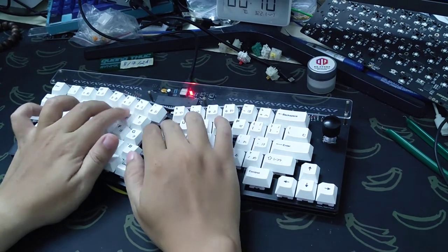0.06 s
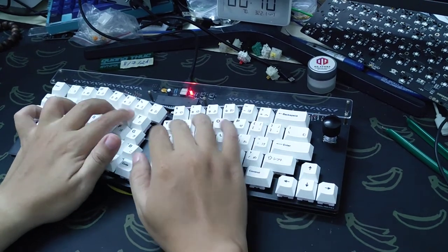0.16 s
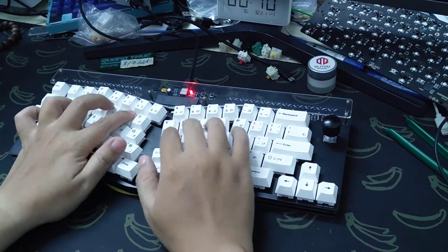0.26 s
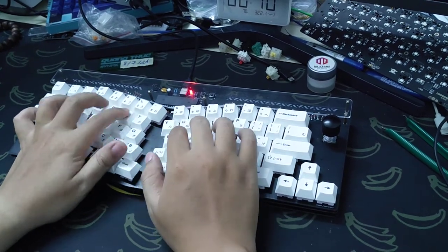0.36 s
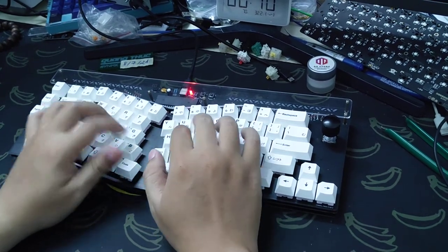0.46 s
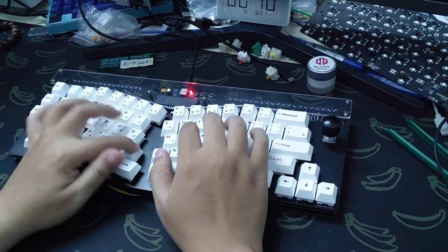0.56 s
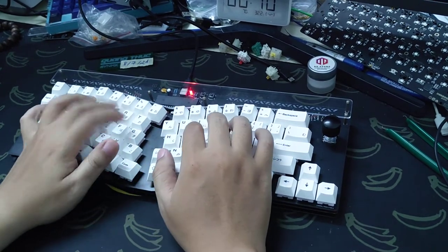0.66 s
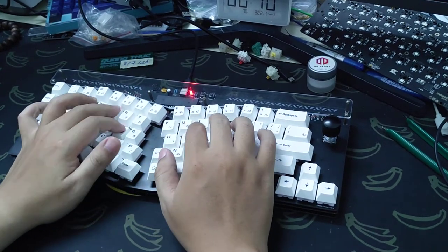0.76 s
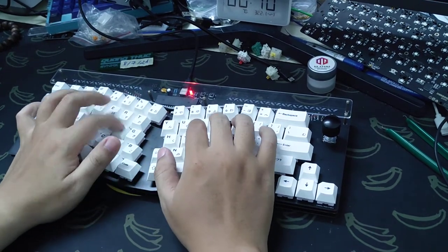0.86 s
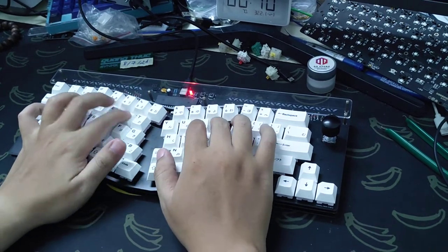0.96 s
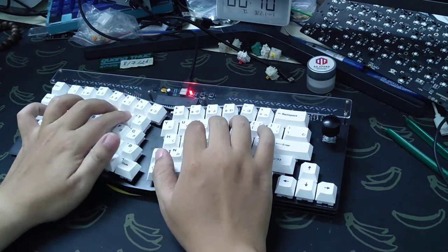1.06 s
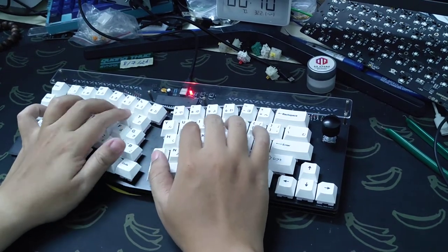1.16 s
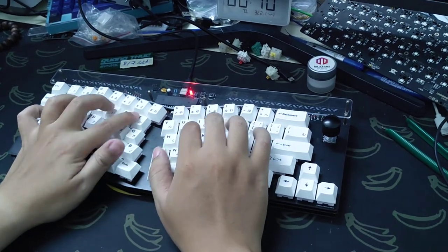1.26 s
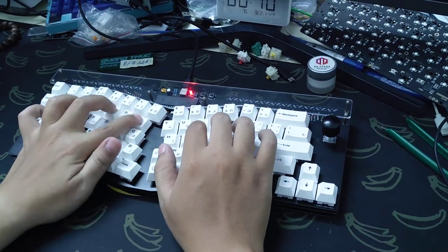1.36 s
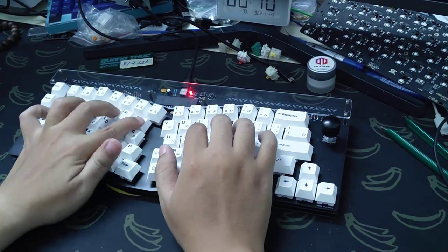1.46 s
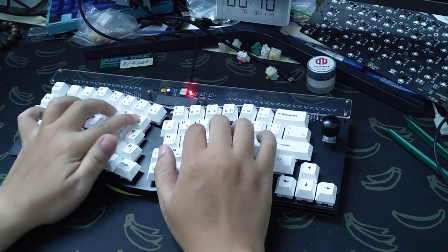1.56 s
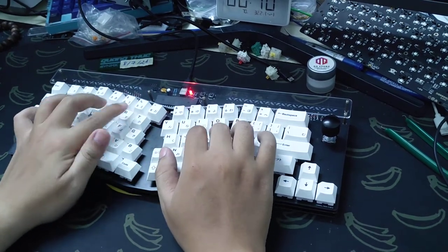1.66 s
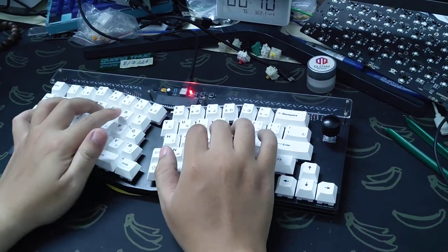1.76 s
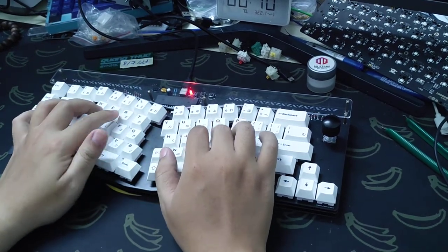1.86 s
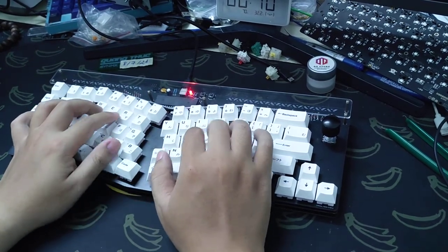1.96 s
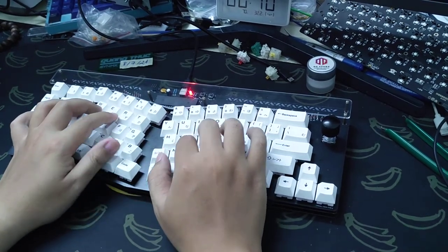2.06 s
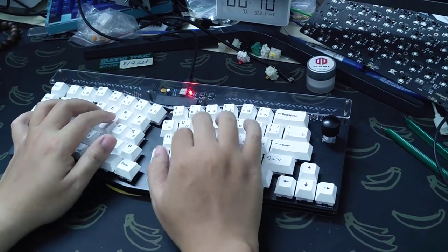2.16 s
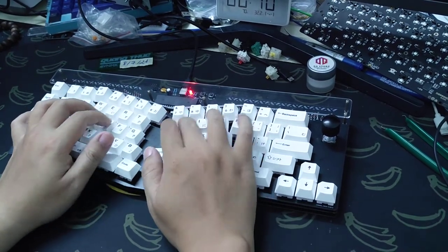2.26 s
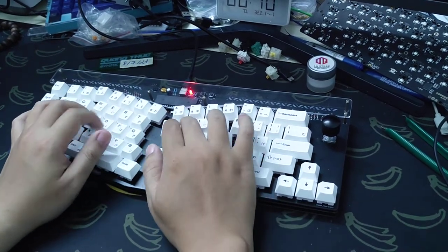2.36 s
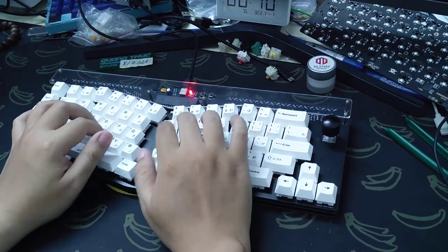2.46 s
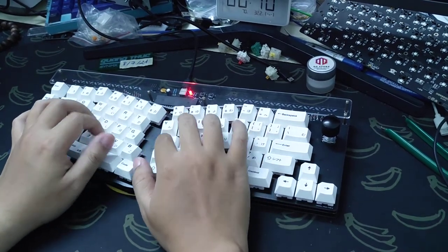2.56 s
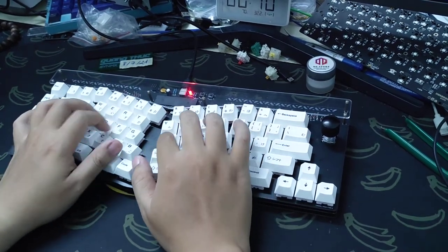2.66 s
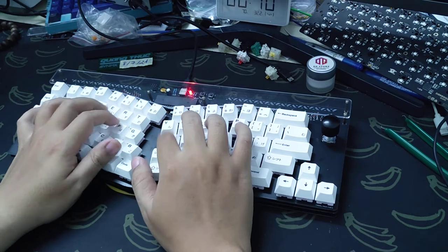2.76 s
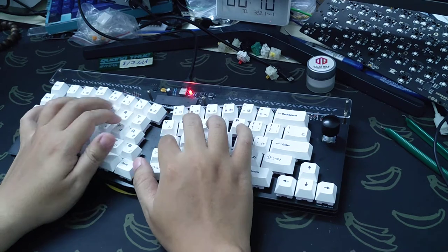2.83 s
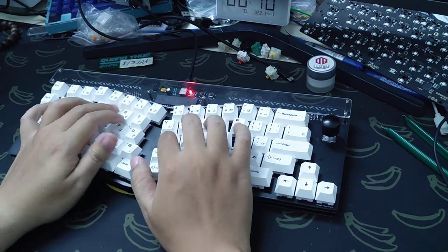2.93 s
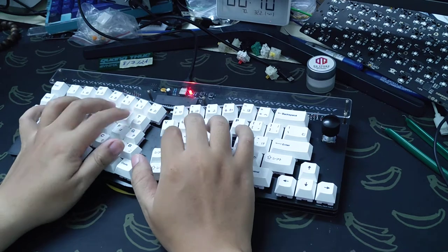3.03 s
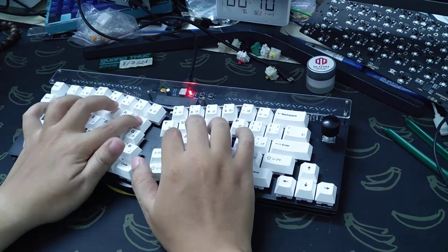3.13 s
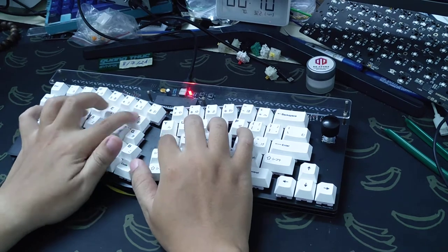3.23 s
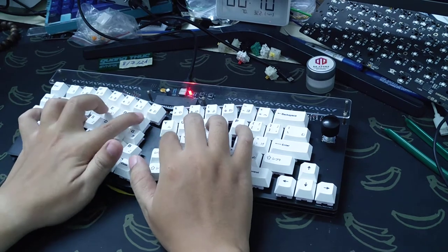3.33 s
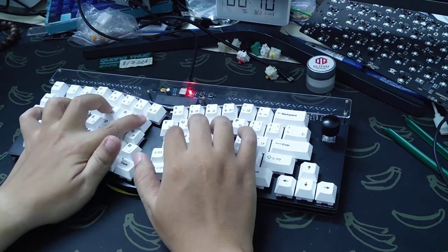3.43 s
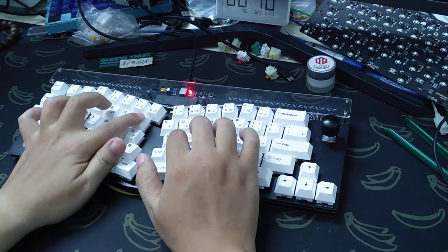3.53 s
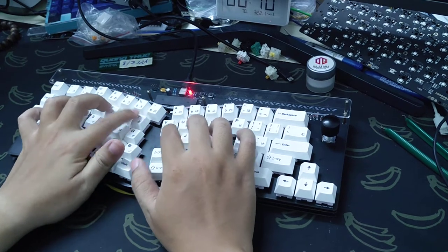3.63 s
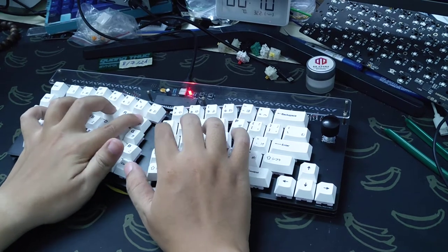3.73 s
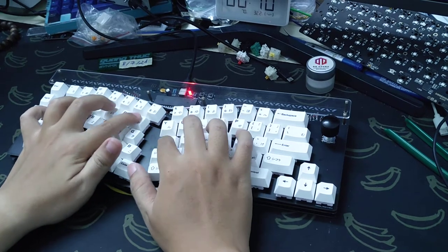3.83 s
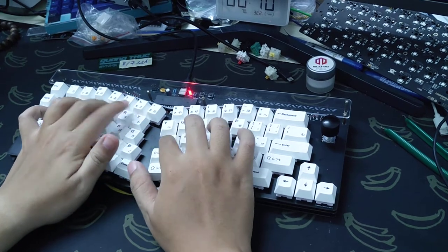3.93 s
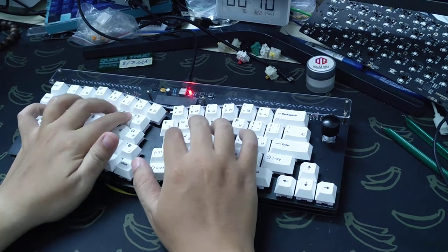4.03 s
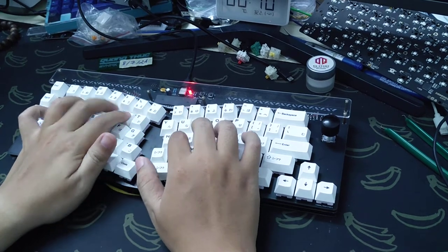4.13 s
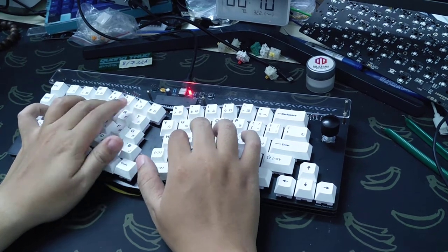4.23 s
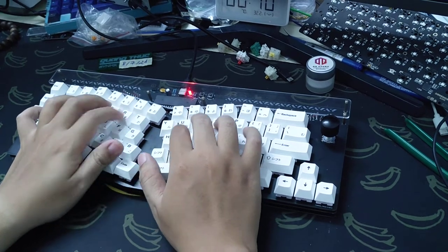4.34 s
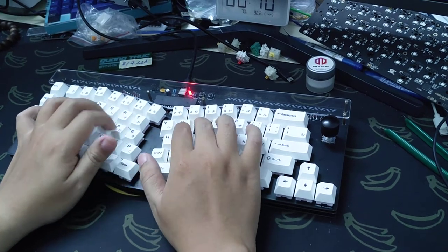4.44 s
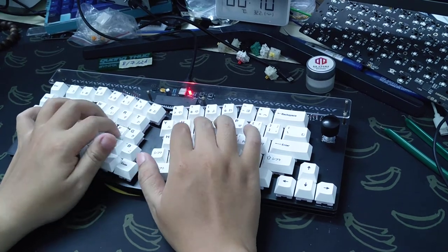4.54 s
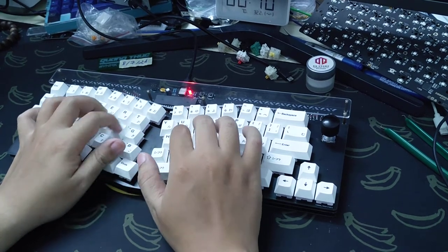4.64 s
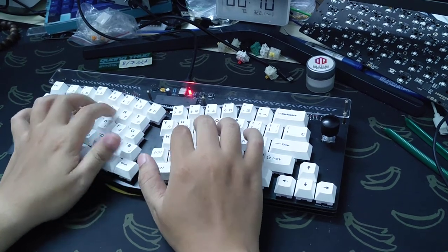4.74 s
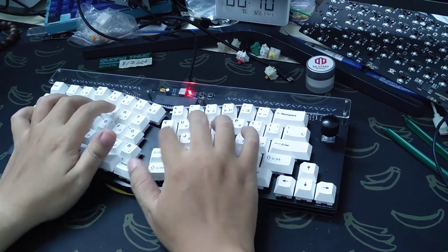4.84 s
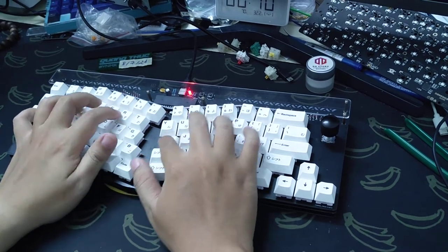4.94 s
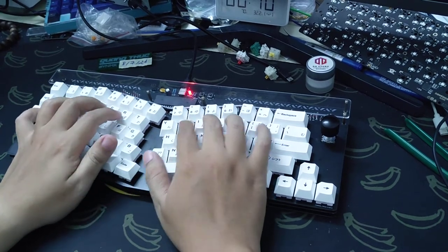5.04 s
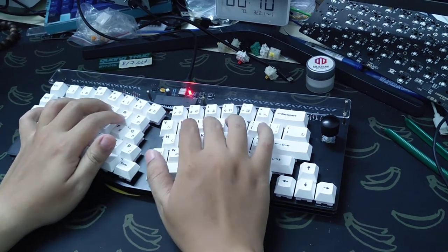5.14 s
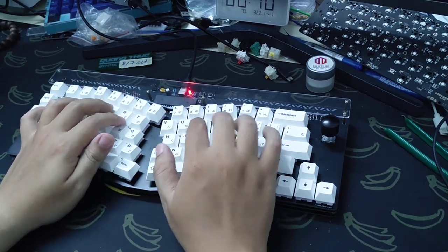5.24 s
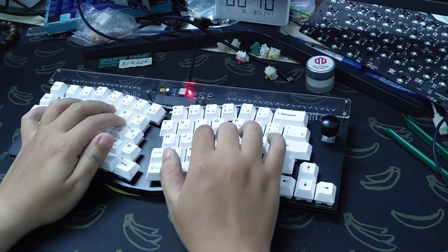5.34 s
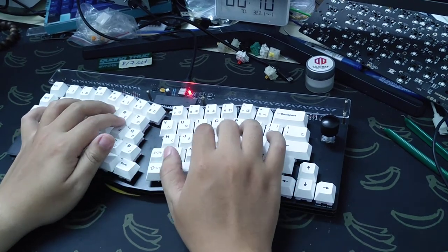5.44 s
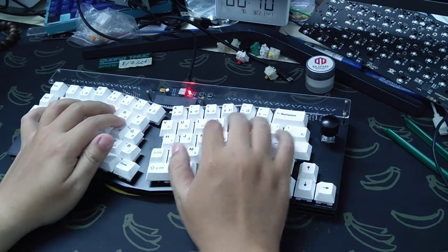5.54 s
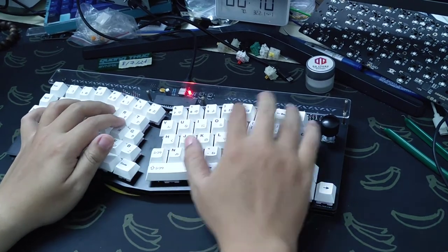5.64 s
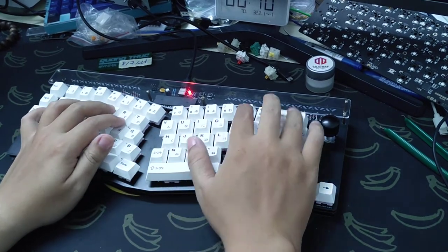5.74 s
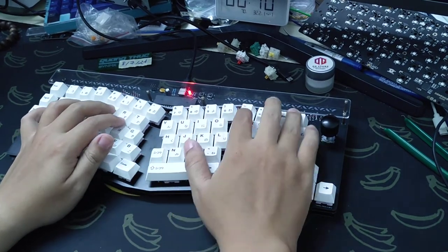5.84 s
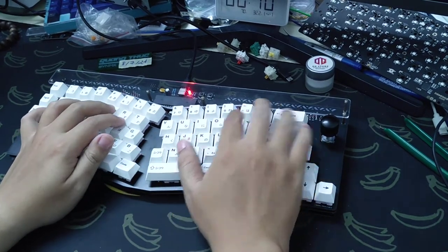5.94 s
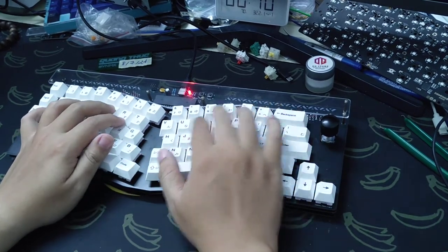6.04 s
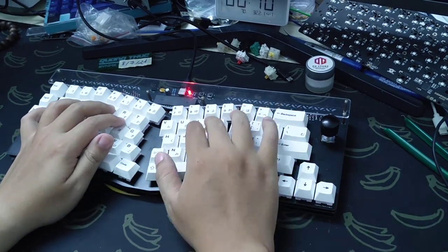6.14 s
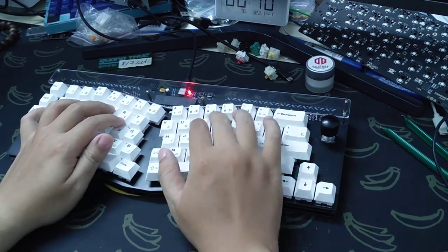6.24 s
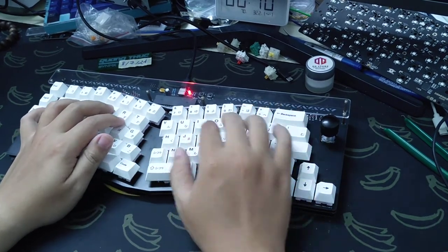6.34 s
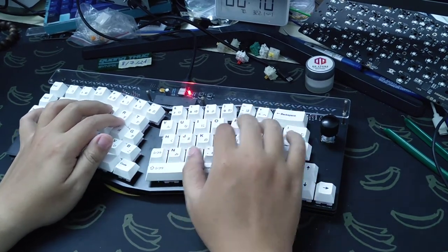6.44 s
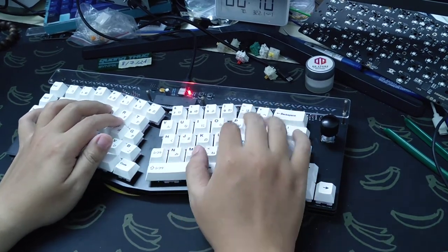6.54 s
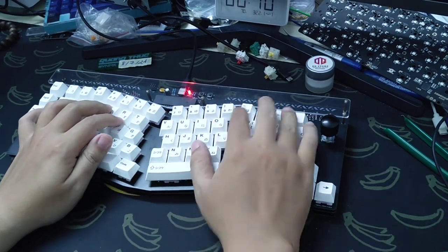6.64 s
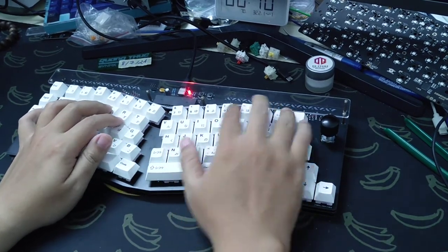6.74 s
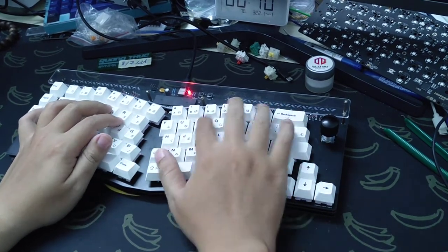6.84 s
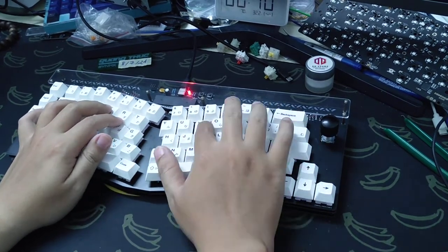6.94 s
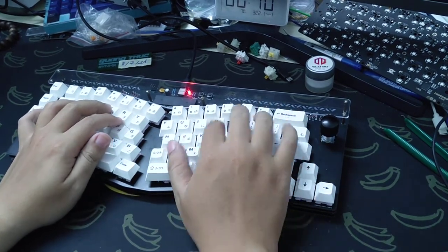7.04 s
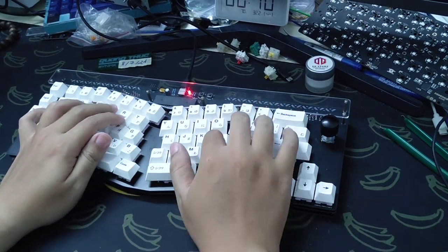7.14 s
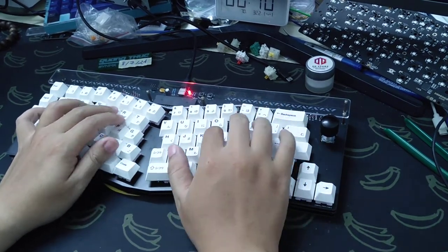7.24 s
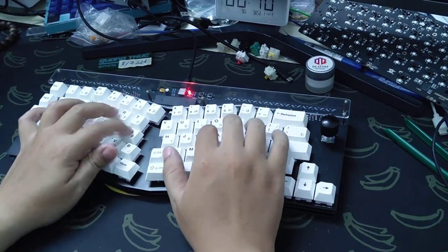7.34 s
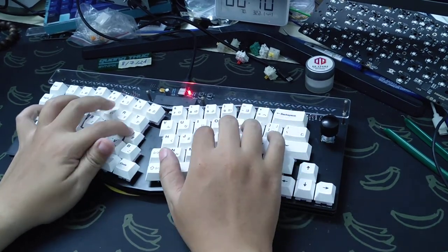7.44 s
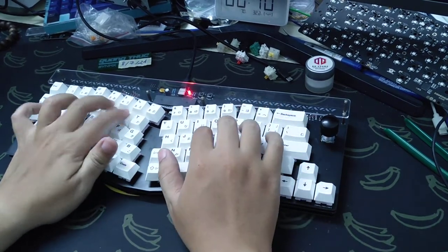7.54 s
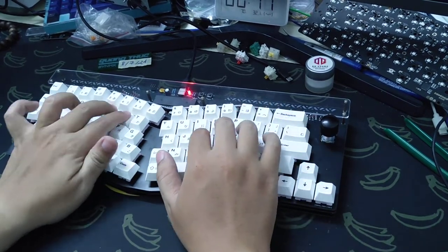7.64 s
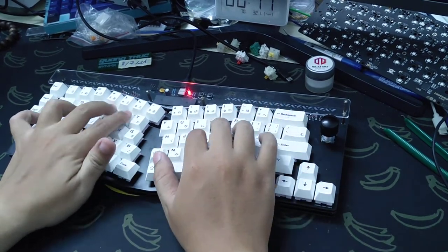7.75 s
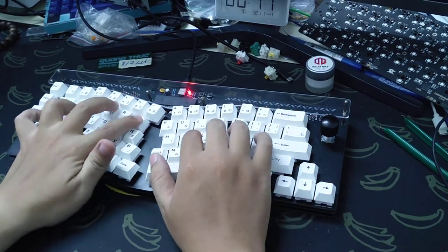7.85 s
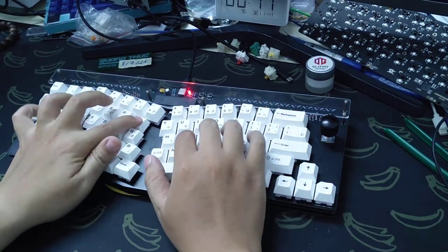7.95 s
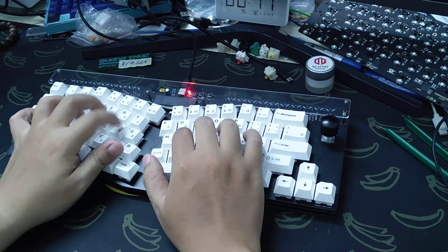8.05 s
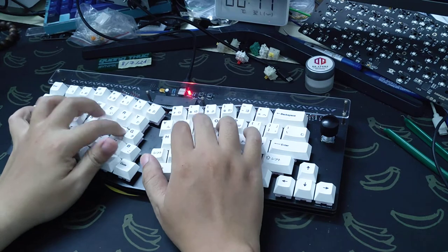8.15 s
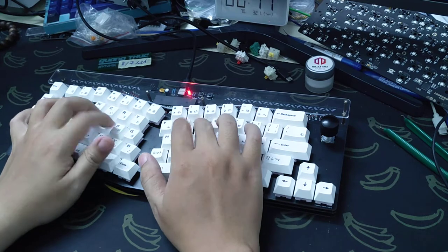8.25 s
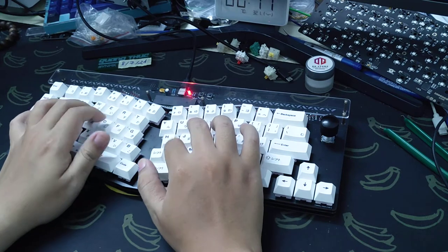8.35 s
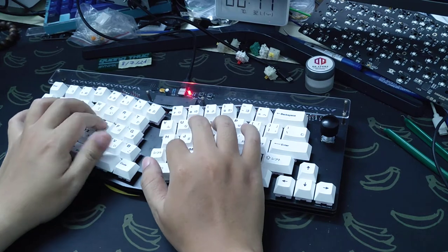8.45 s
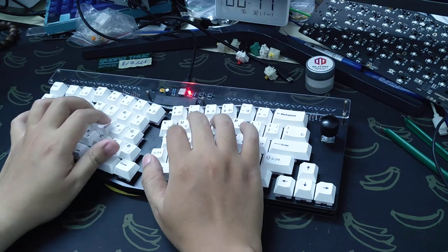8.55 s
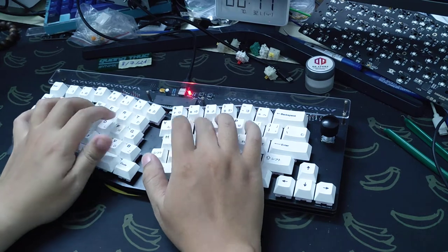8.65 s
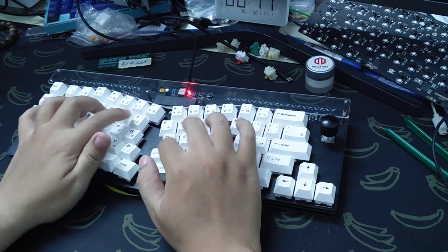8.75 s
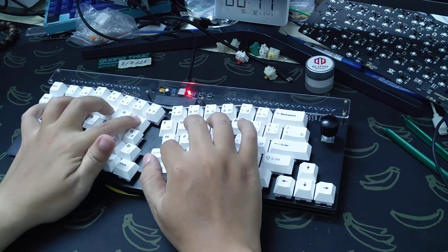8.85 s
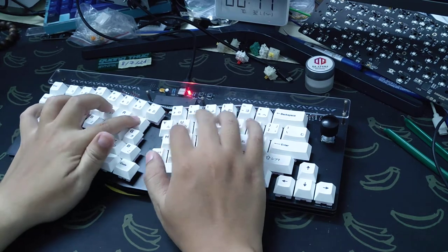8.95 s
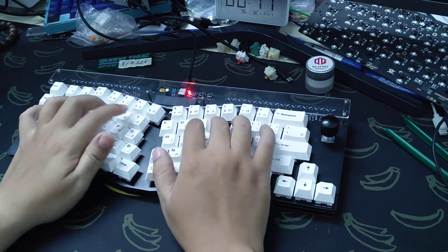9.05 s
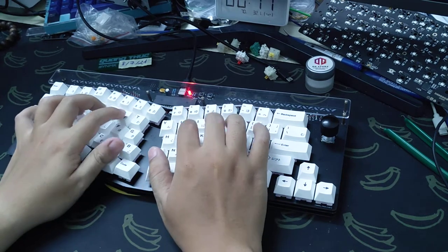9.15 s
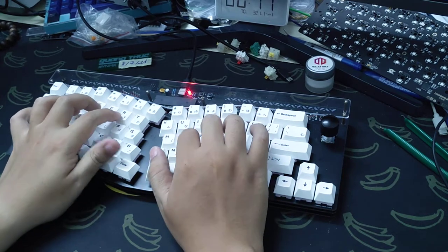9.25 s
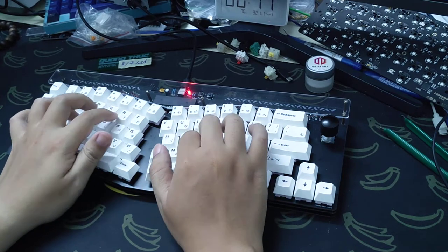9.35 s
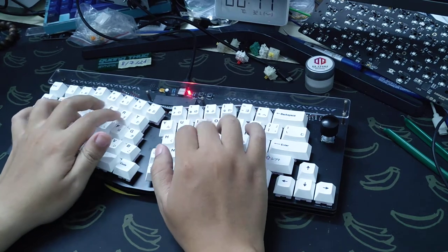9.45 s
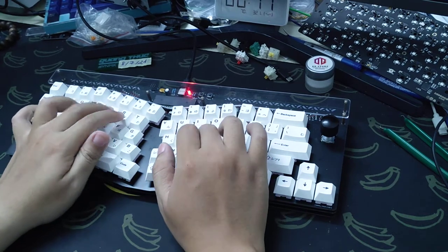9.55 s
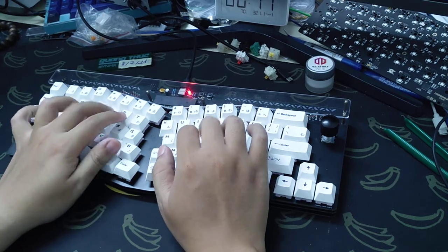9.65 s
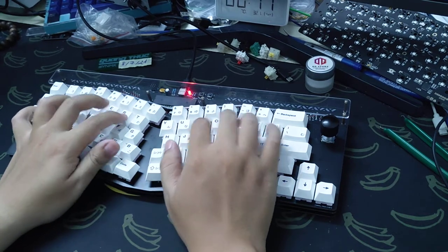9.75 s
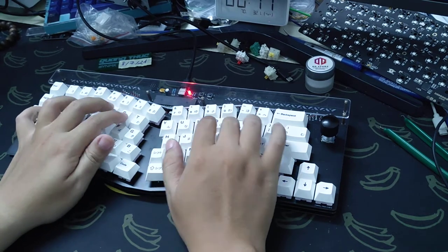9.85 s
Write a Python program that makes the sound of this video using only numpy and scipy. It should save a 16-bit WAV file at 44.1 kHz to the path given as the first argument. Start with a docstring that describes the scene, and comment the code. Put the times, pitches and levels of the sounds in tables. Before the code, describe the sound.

Fast, bright mechanical keyboard typing close up, uneven clacks and ticks with brief pauses, over a faint wavering low hum in a small quiet room.

```python
"""Two hands type fast on a mechanical keyboard on a soft desk mat: each stem striking its housing is a cluster
of contacts that sets damped modes of the plastic caps and case ringing, under a bright bare tick.
Fingertips touch and slide over the caps (grainy hiss), and a stabiliser wire pings as a single resonator.
Wrists shift on the mat (dull noise); nearby fans and drives hum (wavering sines over coloured noise).
A small quiet room adds one echo and a diffuse tail to the keyboard sounds."""
import sys
import numpy as np
from scipy import signal
from scipy.fft import rfft, irfft
from scipy.io import wavfile
from scipy.ndimage import uniform_filter1d

SR = 44100
rng = np.random.default_rng(int(sys.argv[2]) if len(sys.argv) > 2 else 0)


def boost_factor(decibels):
    """Convert a level in decibels to a linear amplitude factor."""
    exponent = np.asarray(decibels, float) / 20
    return 10 ** exponent


def master_out(mix):
    """Clip the mix to full scale and print it as 16-bit PCM to the path in sys.argv[1]."""
    frames = np.transpose(np.atleast_2d(mix))
    ceiling = np.clip(frames, -1, 1)
    pcm = np.round(ceiling * 32767).astype(np.int16)
    wavfile.write(sys.argv[1], SR, pcm)


N = 436149
BOUNCE_S = 0.0105   # from a blow to the second landing of the stem


def in_time(rows):
    """Linear interpolation of (s, value) rows over the whole scene."""
    s, value = np.transpose(rows)
    return np.interp(np.arange(N) / SR, s, value)


def at_hz(points, hz):
    """Interpolation of a (Hz, value) table on a logarithmic frequency axis."""
    table_hz, value = np.transpose(points)
    return np.interp(np.log(hz), np.log(table_hz), value)


def rms_one(x):
    """Normalisation to unit root-mean-square."""
    return x / np.sqrt(np.mean(x ** 2) + 1e-20)


def drift(rate):
    """Slow random modulation: normal draws of spread 1, rate per second, joined by straight lines."""
    knots = rng.standard_normal(int(rate * N / SR) + 2)
    return np.interp(np.linspace(0, len(knots) - 1, N), np.arange(len(knots)), knots)


def diffuse(spectrum, size=N):
    """Diffuse-field coherence: coloured stereo noise of rms 1, alike in the bass, unrelated in the treble."""
    # left-right likeness of diffuse sound: frequency_hz, likeness (0 to 1)
    likeness = [(60, .998), (130, .997), (290, .9), (640, .75), (1400, .5), (3000, 0)]
    mid, side = rfft(rng.standard_normal((2, size)))
    hz = np.maximum(np.arange(len(mid)) * SR / size, 1)
    alike = np.clip(at_hz(likeness, hz), 0, 1)
    left_right = np.array([[1], [-1]])
    pair = np.sqrt(1 + alike) * mid + np.sqrt(1 - alike) * side * left_right
    return rms_one(irfft(pair * boost_factor(at_hz(spectrum, hz)), size))


def hum():
    """Superposition of wavering motor tones and whines over fan air; the two lowest beat seven times a second."""
    # motor tones and faint high whines: frequency_hz
    tone_hz = [75.7, 82.8, 98.2, 99.9, 120.1, 352.9, 6675, 8393, 9469]
    # their rms levels before the waver: level_db
    tone_db = [-50.3, -56, -64, -60.5, -50.3, -65.5, -91, -96, -98]
    # colour of fan air and room tone: frequency_hz, density_db (relative, per Hz)
    air = [(25, -18), (45, 0.5), (70, -4.5), (125, 0), (170, -12.5), (300, -16), (550, -17.5), (1000, -23),
           (1800, -32.5), (3500, -26.5), (6500, -37.5), (11000, -61), (15500, -58)]
    air_db, waver_db, waver_turns = -55.5, 2.3, 0.07   # the phase waver is in turns at 100 Hz
    t = np.arange(N) / SR
    tones = 0
    for hz, db in zip(tone_hz, tone_db):
        level = np.sqrt(2) * boost_factor(db + waver_db * drift(2.5))
        turns = hz * t + rng.random() + waver_turns * np.sqrt(hz / 100) * drift(3)
        tones = tones + level * np.sin(2 * np.pi * turns)
    return tones + boost_factor(air_db) * diffuse(air)


def wrists():
    """Friction noise: the dull, lumpy rustle of skin and cloth on the mat."""
    # course of the rustle before its random lumps: time_s, level_db
    shifts = [(0, -53), (.7, -60), (.85, -49.5), (1.1, -54.5), (1.35, -48), (1.55, -55.5), (1.72, -62.5),
              (1.85, -47), (2.0, -56.5), (2.1, -48), (2.3, -63.5), (2.5, -43), (2.65, -50), (2.9, -56.5),
              (3.1, -61.5), (3.35, -50), (3.6, -62), (5.5, -64.5), (9.89, -65)]
    # colour of the rustle: frequency_hz, density_db (relative, per Hz)
    rustle = [(150, -22.5), (250, -6.5), (450, 3.5), (700, -3.5), (1200, -1.5), (2500, -21)]
    lumpy_db, grain_db = 2.5, 2.0
    level_db = in_time(shifts) + lumpy_db * drift(14) + grain_db * drift(70)
    return boost_factor(level_db) * diffuse(rustle)


def room_tail():
    """Statistical reverberation: octave bands of noise, each decaying exponentially at its own rate."""
    # reverberation time: frequency_hz, t60_s
    decay = [(500, 0.23), (1500, 0.15), (4000, 0.22), (12000, 0.16)]
    tail_db, delay_s = -5, 0.011
    size = SR // 2
    t = np.arange(size) / SR
    noise = diffuse([(20, 0.0041), (20000, 0.016)], size=size)   # practically white
    tail = 0
    for hz in 250 * 2 ** np.arange(6):
        octave = signal.butter(2, [hz, min(2 * hz, 0.4 * SR)], "band", fs=SR, output="sos")
        tail = tail + signal.sosfilt(octave, noise) * boost_factor(-60 * t / at_hz(decay, hz * np.sqrt(2)))
    tail = tail * np.clip(t / delay_s - 0.5, 0, 1) * (t < 0.45)   # fades in around the delay
    # flatten the fine structure of the spectrum so that no narrow band stands out
    colour = rfft(tail)
    fine, broad = (uniform_filter1d(np.abs(colour) ** 2, width) for width in (60, 600))
    tail = irfft(colour * np.sqrt(broad / (fine + 1e-20)), size)
    return boost_factor(tail_db) * tail / np.sqrt((tail ** 2).sum(axis=1, keepdims=True))


def room(x):
    """Early reflection and reverberation: one dull echo off the wall behind the desk, then a diffuse tail."""
    echo_s, echo_db = 0.012, -14.5
    lag = int(echo_s * SR)
    swapped = np.pad(x[::-1], ((0, 0), (lag, 0)))[:, :N]   # left and right trade places
    echo = signal.lfilter([0.4], [1, -0.6], swapped)
    mono = x.mean(axis=0, keepdims=True)
    return boost_factor(echo_db) * echo + signal.fftconvolve(mono, room_tail(), axes=1)[:, :N]


def pings():
    """Damped resonator: a thin stabiliser wire rings on one note after some strokes, shaken twice."""
    # strokes that set the wire ringing: time_s, drive_db
    shakes = [(2.3385, -35), (4.9444, -37), (5.5242, -46), (5.5942, -46.5), (8.376, -29), (8.4622, -40),
              (8.8234, -34), (9.4723, -31.5)]
    ping_hz, t60_s = 2500, 0.04
    clicks = np.zeros(N) + 1e-18
    for s, db in shakes:
        clicks[int(s * SR)] = boost_factor(db)
        clicks[int((s + BOUNCE_S) * SR)] = boost_factor(db - 2)
    r, w = boost_factor(-60 / (t60_s * SR)), 2 * np.pi * ping_hz / SR
    return signal.lfilter([0, np.sin(w)], [1, -2 * r * np.cos(w), r * r], clicks)


def slides():
    """Stick-slip friction: skin on the cap texture gives grainy hiss that swells and fades with each drag."""
    # fingertip drags: loudest_s, level_db, swell_s, fade_s, treble_db (against the rest)
    drag_rows = [(1.451, -31, 0.064, 0.046, -1.3), (2.228, -50.5, 0.0061, 0.023, 5.3),
                 (2.48, -43, 0.08, 0.064, -10.5), (2.718, -42.5, 0.0039, 0.056, -7),
                 (5.27, -53, 0.053, 0.095, -2.5), (6.44, -64, 0.025, 0.024, 4.5),
                 (7.0, -59, 0.074, 0.054, -13)]
    # colour of the hiss: frequency_hz, density_db (relative, per Hz)
    texture = [(500, -13), (950, 1.5), (1700, -12), (2300, 0.5), (4400, 4.5), (5700, 4), (7000, -2.5),
               (11400, -4.5), (15000, -12)]
    grain_db, slip_db = 4.0, 2.0
    t = np.arange(N) / SR
    hiss = diffuse(texture)
    dull = signal.sosfilt(signal.butter(2, 5000, fs=SR, output="sos"), hiss)
    treble = hiss - dull
    smooth = 0
    for s, db, swell_s, fade_s, treble_db in drag_rows:
        drag = boost_factor(db) * np.exp(-((t - s) / np.where(t < s, swell_s, fade_s)) ** 2)
        smooth = smooth + drag * (dull + boost_factor(treble_db) * treble)
    return boost_factor(grain_db * drift(400) + slip_db * drift(50)) * smooth


def strokes():
    """Spectral balance of an impact: time and strength in four registers for every stroke and touch."""
    # stems hitting bottom or snapping back up: time_s, level_db,
    # depth_db (low thock against the level), edge_db (high tick against the level)
    key_rows = [(0.027, -25, -8.5, -62), (0.1762, -14, -38, -14.5), (0.229, -23.5, -35, -39),
                (0.3129, -18, -39, -20), (0.3697, -15, -39, -15.5), (0.4504, -30, -4.5, -27),
                (0.462, -41, -4, -7), (0.515, -25.5, -28, -20.5), (0.5932, -29.5, 3.5, -6),
                (0.6924, -13, -13.5, -19), (0.7827, -39, -28, 1.5), (0.8664, -11.5, -19, -11.5),
                (0.9419, -16.5, -26, -12), (0.9924, -29.5, -23, -3.5), (1.066, -23, -11.5, -2.5),
                (1.1033, -17, -25, -23), (1.155, -16.5, -25, -13.5), (1.245, -15, -28, -20.5),
                (1.3217, -30.5, 0, -14.5), (1.555, -26.5, -16.5, -14), (1.6196, -15.5, -17, -16.5),
                (1.7697, -32.5, -13, -8.5), (1.8156, -36.5, -17, -15), (1.926, -30.5, -26, -12),
                (2.0227, -22, -38, -25), (2.1031, -25.5, -7, -11.5), (2.2725, -38, -5, -9.5),
                (2.3394, -27.5, -8, -13), (2.618, -14, -23, -54), (2.7276, -27, -5, -8),
                (2.7395, -18.5, -11, -25), (2.8429, -27, -6.5, -23), (2.9851, -18, -8.5, -16.5),
                (3.078, -17.5, -19, -17), (3.1618, -23.5, -12.5, -62), (3.2056, -37, -2, 0),
                (3.283, -17, -24, -13), (3.4056, -18, -12, -18.5), (3.521, -22, -29, -29),
                (3.578, -20, -30, -37), (3.6705, -26.5, -8.5, -12.5), (3.879, -12, -22, -15.5),
                (4.0045, -19.5, -16, -25), (4.0294, -32, -17, -12), (4.123, -16, -25, -17.5),
                (4.1838, -16.5, -32, -18), (4.232, -34.5, -12, 2), (4.3298, -13, -30, -10.5),
                (4.349, -24.5, -8, -8.5), (4.4119, -24, -4.5, -15.5), (4.5698, -28.5, -2.5, -20),
                (4.595, -21, -17, -17), (4.662, -22.5, -15, -18), (4.777, -18.5, -13, -47),
                (4.815, -28, -12, -12), (4.9425, -21.5, -13, -23), (5.0703, -18.5, -25, -16.5),
                (5.164, -31.5, -41, -3.5), (5.323, -29, -14.5, -17), (5.527, -41, -11.5, -36),
                (5.5934, -36, -37, -40), (5.8411, -14, -11, -16.5), (5.934, -18.5, -8, -18.5),
                (6.0007, -19, -10.5, -20), (6.123, -33.5, -6.5, -38), (6.3663, -31.5, -15, -13.5),
                (6.827, -29, -8.5, -22), (6.9484, -36.5, -7, -22), (7.0435, -39.5, -16, -23),
                (7.15, -33.5, -29, -19), (7.2728, -26.5, -26, -24), (7.34, -14, -18, -18.5),
                (7.4163, -20, -7.5, -32), (7.47, -31.5, -24, -18), (7.5567, -19, -12.5, -17),
                (7.6492, -21, -9, -7), (7.7391, -18.5, -28, -18.5), (7.7906, -24.5, -29, -25),
                (7.892, -20.5, -30, -13.5), (7.9351, -23.5, -29.5, -12), (8.0303, -17, -31, -26),
                (8.0581, -30.5, -11, -8.5), (8.1189, -19.5, -6, -32), (8.1621, -24, -24, -22),
                (8.2575, -23, -29, -11.5), (8.32, -29.5, -4.5, -24), (8.375, -29, -13, -11),
                (8.3974, -34, -5, 1.5), (8.543, -31, -27, -13), (8.5788, -20, -32, -14),
                (8.6575, -14.5, -10.5, -30), (8.6866, -29, -8, -5), (8.8083, -28, -2, -16),
                (8.8212, -21.5, -33, -17), (8.9033, -33.5, -26, -15), (8.9981, -31.5, -24, -17.5),
                (9.0401, -13.5, -37, -18), (9.09, -30, -5.5, -6), (9.1907, -26.5, -37, -12),
                (9.2303, -20.5, -14.5, -22), (9.314, -21, -13.5, -23.5), (9.4723, -25, -6.5, -47),
                (9.5717, -18, -17, -23), (9.678, -17, -24, -20.5), (9.7718, -22.5, -18, -17.5),
                (9.836, -20, -7.5, -28), (9.87, -24, -39.5, 2.5)]
    # fingertips landing on a cap and loose caps clicking, thin and bright: time_s, level_db
    touch_rows = [(0.012, -33), (0.089, -37), (0.155, -44), (0.167, -37), (.264, -27), (0.291, -34),
                  (0.761, -26), (1.05, -36), (1.2324, -23), (1.3776, -28.5), (1.756, -37), (1.858, -40),
                  (1.892, -40), (1.906, -38), (1.999, -38), (2.064, -35), (2.596, -33), (2.7136, -33),
                  (2.9725, -29), (3.052, -36.5), (3.3898, -31), (3.488, -35.5), (3.5062, -28), (3.655, -41),
                  (3.734, -38.5), (3.9939, -30.5), (4.1023, -38), (4.3177, -32), (4.459, -32), (4.923, -41),
                  (5.0573, -25), (5.218, -41), (5.308, -44), (5.499, -48.5), (6.265, -42), (7.247, -43),
                  (7.313, -33), (7.727, -37), (7.88, -32), (8.24, -30), (8.342, -42), (8.4592, -30.5),
                  (8.507, -40), (8.5614, -22.5), (8.6457, -32), (8.955, -37), (9.217, -41), (9.441, -43),
                  (9.466, -30), (9.699, -30)]
    clack_db, knock_db = 3, -9   # upper and middle modes against the level
    usual_depth_db, deep_dulls = -13, 0.79   # deeper strokes lose clack, dB per dB
    usual_edge_db, edge_brightens = -20, 0.17   # sharper strokes gain clack, dB per dB
    s, db, depth_db, edge_db = np.transpose(key_rows)
    loss_db = deep_dulls * np.maximum(depth_db - usual_depth_db, 0)
    clack = db + clack_db - loss_db + edge_brightens * (edge_db - usual_edge_db)
    at, touch_db = np.transpose(touch_rows)
    full = [s, clack, db + depth_db, db + knock_db, db + edge_db]
    thin = [at, touch_db, touch_db - 25, touch_db - 14.5, touch_db - 14]   # same registers
    return np.hstack([full, thin])


def contact_forces(clack, lead, size):
    """Impact as a random train of micro-contacts: spectra of the blow, the rebound and the dying rattle."""
    rise_s, travel_s, travel_db = 0.00037, 0.0059, -24   # the stem scrapes faintly as it travels
    contact_s, contacts_per_s, first_db = 0.0018, 20000, 7.5
    rattle_s = 0.034   # cap and spring settling after the blow
    bounce_spread_s, bounce_db = 0.00085, -19.5
    lumpy_db, softness = 4.5, 0.33   # softness in dB per dB
    count = len(clack)
    t = (np.arange(lead + 4000) - lead) / SR
    # light strokes land slower and rattle more for their size
    light_db = softness * (clack.max() - clack)[:, None]
    before = np.exp(-np.abs(t) / rise_s) + boost_factor(travel_db) * np.exp(-np.abs(t) / travel_s)
    after = np.exp(-np.abs(t) / (contact_s * boost_factor(light_db)))
    blow = np.where(t < 0, before, after)
    lumps = np.repeat(rng.standard_normal((count, 35)), 140, axis=1)   # bursts of about 3 ms
    rattle = (t > 0) * np.exp(-np.abs(t) / rattle_s) * boost_factor(lumpy_db * lumps + light_db)
    # the stem rebounds and lands once more
    late = t - BOUNCE_S - bounce_spread_s * rng.standard_normal((count, 1))
    rebound_level = boost_factor(bounce_db + lumpy_db * np.minimum(lumps[:, :1], 1))
    rebound = rebound_level * (late > 0) * np.exp(-np.abs(late) / contact_s)
    happens = rng.random((count, len(t))) < contacts_per_s / SR
    strength = 2 * rng.random((count, len(t))) - 1
    contacts = happens * strength * np.sqrt(3 * SR / contacts_per_s)
    contacts[:, lead] = boost_factor(first_db)
    contacts /= np.sqrt(((contacts * blow) ** 2).sum(axis=1, keepdims=True))
    hit, bounce, shake = (rfft(contacts * shape, size) for shape in (blow, rebound, rattle))
    hit /= uniform_filter1d(np.abs(hit), 40, axis=1) ** 0.7 + 0.1   # no wide gap in its colour
    return hit, bounce, shake


def ears(db, luck):
    """Interaural level difference: gain of every stroke at the left and right microphone."""
    left_db, mode_spread_db, ear_spread_db = 1.4, 1.5, 3.5
    lean_db = left_db / 2 + ear_spread_db * luck[:, 1]
    return boost_factor(db + mode_spread_db * luck[:, 0] + np.array([lean_db, -lean_db]))[..., None]


def ticks(tick, forces, size):
    """High modal overlap: above about 3.5 kHz damped modes merge into a bare tick, filtered but not ringing."""
    tick_db, tick_rattle_db = 29, -22.5
    hit, bounce, shake = forces
    edge = np.vstack([signal.butter(2, 3300, "high", fs=SR, output="sos"),
                      signal.butter(1, 5000, fs=SR, output="sos")])   # falls with pitch
    edge = rfft(signal.sosfilt(edge, np.arange(size) == 0))
    luck = rng.standard_normal((len(tick), 2))
    return ears(tick + tick_db, luck) * edge * (hit + bounce + boost_factor(tick_rattle_db) * shake)


def board_modes(clack, thock, knock, forces, size):
    """Modal synthesis: the contact forces drive damped two-pole resonances of case, plate and caps."""
    # modes of case, plate and caps: frequency_hz (before detuning), level_db (relative), t60_s
    modes = [(615, -7.5, 0.019), (766, -1.5, 0.043), (803, 5.5, 0.0088), (1025, 0.5, 0.026),
             (1188, 6, 0.014), (1544, -2, 0.022), (1796, -6, 0.0067), (2491, -5, 0.0049),
             (2853, -2.5, 0.0056), (3454, 3.5, 0.0012), (4362, -5, 0.0012), (1962, -8, 0.0048)]
    modes_db, rattle_db = 3, -27
    detune = 0.035   # each key sits elsewhere on the plate, so its modes shift by this share
    ear_spread_hz = 2000   # below this the microphones hear the board more alike
    hit, bounce, shake = forces
    turn = np.exp(-2j * np.pi * np.arange(size // 2 + 1) / size)   # one sample of delay
    out = 0
    for k, (hz, level_db, t60) in enumerate(modes):
        register_db = thock if hz < 950 else knock if hz < 1550 else clack
        luck = rng.standard_normal((len(clack), 3))
        r = boost_factor(-60 / (t60 * SR))
        w = 2 * np.pi * hz / SR * (1 + detune * luck[:, 2:])
        ring = np.sin(w) * turn / (1 - 2 * r * np.cos(w) * turn + (r * turn) ** 2)
        # even out how strongly the blow happens to excite this mode
        mode_bin = (w * size / (2 * np.pi)).astype(int)
        drive = np.abs(np.take_along_axis(hit, mode_bin, axis=1)) + 0.46
        force = (hit + bounce) / drive + boost_factor(rattle_db) * shake
        gain = ears(register_db + level_db + modes_db, luck * [1, min(hz / ear_spread_hz, 1), 1])
        out = out + (-1) ** k * gain * (ring * force)
    return out


def keys():
    """Impact excitation of a damped structure: scrape, blow, rebound and rattle ring the board."""
    lead, size = 900, 8192   # samples ahead of the blow, samples per stroke
    places = 4   # parts of the board, each with its own path through the room
    left_lead = 4   # usual lead of the left microphone in samples
    s, clack, thock, knock, tick = strokes()
    forces = contact_forces(clack, lead, size)
    spectra = ticks(tick, forces, size) + board_modes(clack, thock, knock, forces, size)
    left, right = irfft(spectra, size)
    at = (s * SR).astype(int)
    lag = left_lead + rng.integers(-2, 3, len(s))   # each key lies at its own angle
    place = rng.integers(0, places, len(s))
    board = np.zeros((places, 2, N + 2 * size))
    for i in range(len(s)):
        board[place[i], 0, at[i]:at[i] + size] += left[i]
        board[place[i], 1, at[i] + lag[i]:at[i] + lag[i] + size] += right[i]
    mat = signal.butter(3, 500, "high", fs=SR, output="sos")   # the mat soaks up the bass
    return signal.sosfilt(mat, board[..., lead:lead + N] + 1e-18)


def scene():
    """Superposition: keys, slides and pings excite the room; rustle and hum lie under them."""
    board = keys()
    board[0] += slides() + pings()
    return sum(part + room(part) for part in board) + wrists() + hum()


def low_pass(x):
    """Removes everything above the highest recorded frequency."""
    return signal.sosfilt(signal.butter(12, 16510, fs=SR, output="sos"), x)


def record(dry):
    """Low-pass response: the microphones roll off around 12 kHz, at a lower frequency on the left."""
    left = signal.sosfilt(signal.butter(5, 11800, fs=SR, output="sos"), dry[0])
    right = signal.sosfilt(signal.butter(5, 13200, fs=SR, output="sos"), dry[1])
    return low_pass(np.array([left, right]))


dry = scene()
out = record(dry)
master_out(out)
```